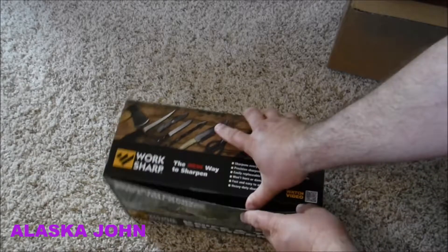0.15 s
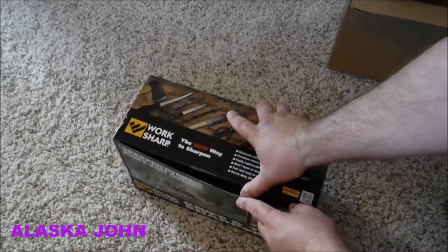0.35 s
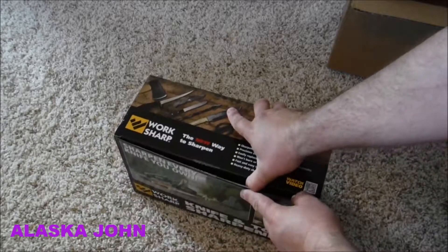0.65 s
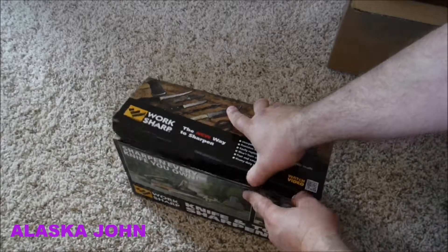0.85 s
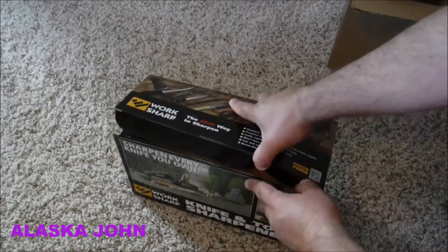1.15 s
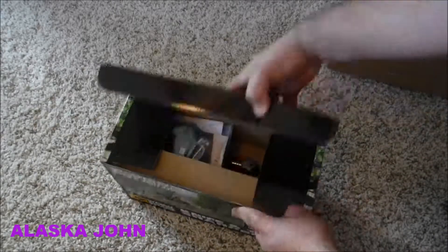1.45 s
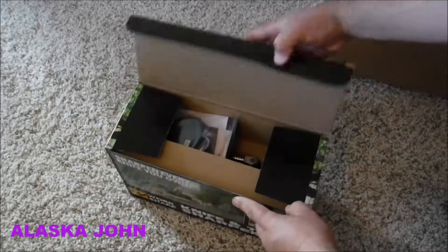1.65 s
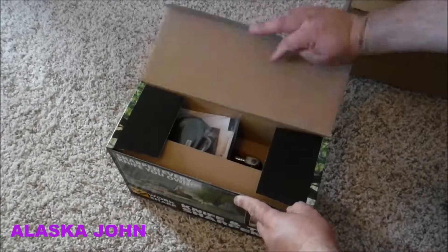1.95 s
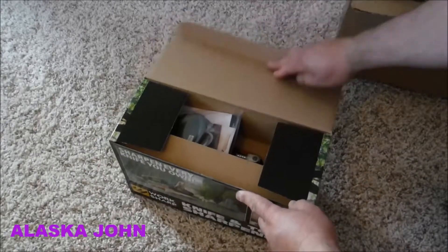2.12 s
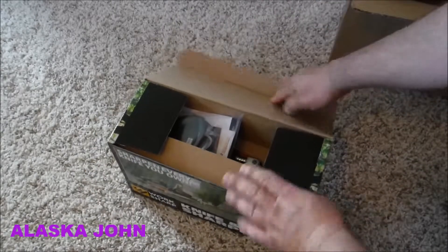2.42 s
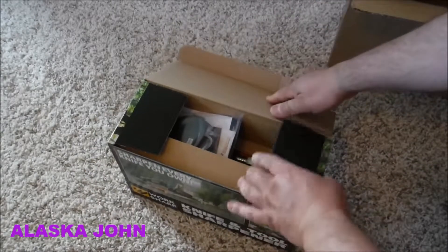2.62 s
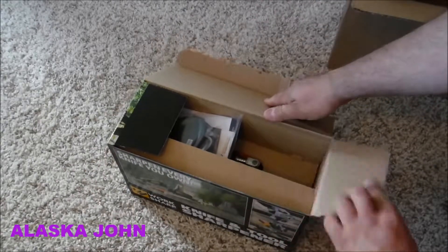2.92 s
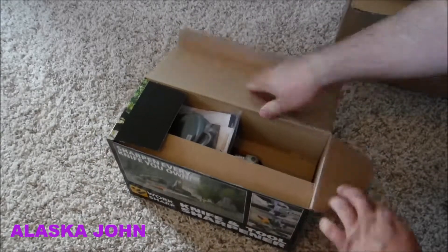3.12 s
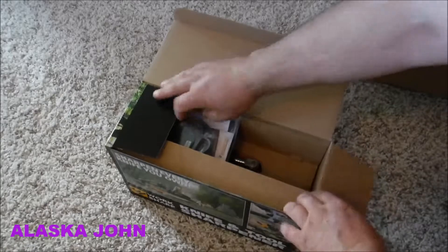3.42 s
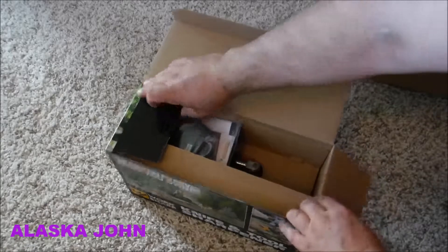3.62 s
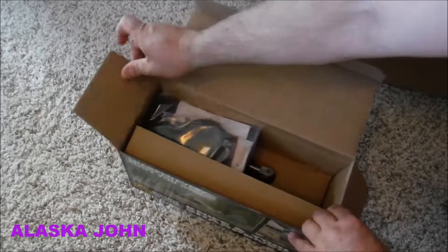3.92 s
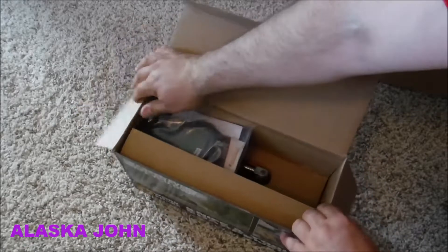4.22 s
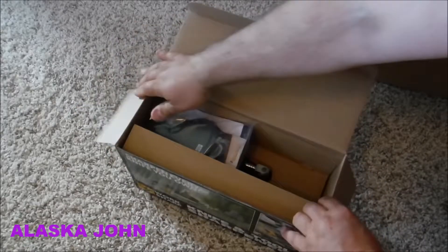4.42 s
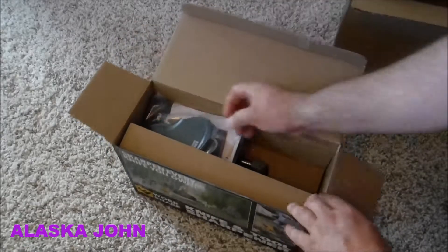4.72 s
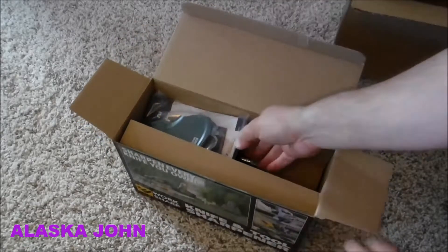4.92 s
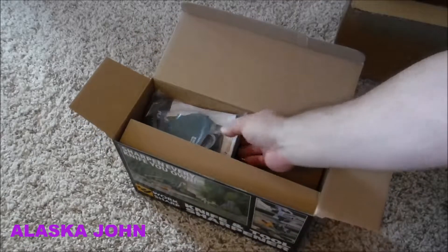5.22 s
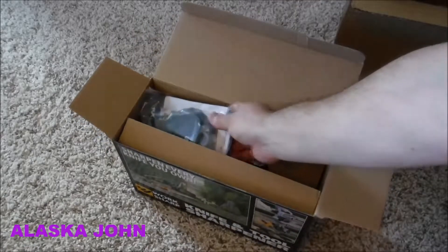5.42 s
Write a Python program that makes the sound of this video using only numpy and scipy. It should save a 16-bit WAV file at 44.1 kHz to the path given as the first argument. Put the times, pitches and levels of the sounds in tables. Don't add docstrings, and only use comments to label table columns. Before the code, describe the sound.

Close, dry indoor handling of a cardboard carton. Quiet card friction, a brief squeaky creak, then hard cracks as locking tabs release, followed by scrapes, small hollow knocks and crease ticks while flaps fold back. After one late sharp snap, fingers rustle thin plastic inside. Pauses reveal faint camera hiss; carpet keeps the room's tail short.

```python
import sys
import numpy as np
from scipy import signal
from scipy.fft import rfft, irfft, next_fast_len
from scipy.io import wavfile
from scipy.ndimage import uniform_filter1d, map_coordinates

SR = 44100
rng = np.random.default_rng(int(sys.argv[2]) if len(sys.argv) > 2 else 0)


def output_pcm(signal):
    pcm = np.clip(np.atleast_2d(signal).T, -1, 1) * 32767
    wavfile.write(sys.argv[1], SR, np.round(pcm).astype(np.int16))


def ratio(d):
    e = np.asarray(d, float) / 20
    return 10 ** e


N = 245195

# (centre [Hz], width [Hz], level [dB])
EDGE_MODES = [(4580, 1690, -1.5), (5920, 920, 4), (6895, 567, 0.5), (7840, 1420, -7.5)]
PANEL_MODES = [(1136, 790, -1.5), (1680, 810, 3.5), (2195, 585, 5), (3460, 2270, -5.5)]
BODY_MODES = [(203, 111, -8), (318, 62, 1), (485, 156, 3), (628, 223, 3.5), (926, 233, -2)]
SHEEN_MODES = [(9800, 2000, 0), (12000, 3000, -4), (14500, 3000, -9)]
PARTS = (EDGE_MODES, PANEL_MODES, BODY_MODES, SHEEN_MODES)


def unit(x):
    return x / np.sqrt(np.mean(x ** 2) + 1e-20)


def along(points, hz):
    f, v = np.transpose(points)
    return np.interp(np.log(hz + 1), np.log(f + 1), v)


def filtered(x, response):
    m = next_fast_len(N + SR // 2)
    return irfft(rfft(x, m) * response(np.fft.rfftfreq(m, 1 / SR)), m)[..., :N]


def resonance(f, hz, width_hz):
    return 1j * f * width_hz / (hz * hz - f * f + 1j * f * width_hz)


def ringing(x, modes):
    def response(f):
        h = 0
        for k, (hz, width_hz, db) in enumerate(modes):
            h = h + (-1) ** k * ratio(db) * resonance(f, hz, width_hz)
        return h / np.sqrt(np.mean(np.abs(h) ** 2))
    return filtered(x, response)


def wobble(rate_hz):
    knots = rng.standard_normal(int(N * rate_hz / SR) + 4)
    return map_coordinates(knots, [np.arange(N) * rate_hz / SR])


def patchy(x, depth_db):
    z = signal.stft(x, nperseg=256)[2]
    field = uniform_filter1d(rng.standard_normal(z.shape), size=3, axis=0)
    field = uniform_filter1d(field, size=6, axis=1)
    return signal.istft(z * ratio(depth_db * unit(field)), nperseg=256)[1][:N]


def parts_db(db, panel_db, kind):
    body_db, sheen_db = kind
    return db + np.array([[0], [panel_db], [body_db + 0.91 * panel_db], [sheen_db]])


def bursts(groups, rise, kick, delay_s):
    t = np.arange(SR // 8) / SR
    force = np.zeros((4, N + SR))
    for rows, kind in groups:
        for s, db, panel_db, t60_s in rows:
            shake = rng.standard_normal((4, len(t)))
            shake[:, :1] = kick
            life_s = np.clip(t60_s, .003, .2) * np.array([[1], [1.3], [2.2], [.7]])
            onset = np.minimum(1, (t + 1 / SR) / (rise * life_s)) ** 2
            shape = ratio(-60 * t / life_s) * onset
            level = ratio(parts_db(db, panel_db, kind) + np.array([[-4], [-1.5], [2], [-5.5]]))
            start = round((s + delay_s) * SR)
            force[:, start:start + len(t)] += shake * shape * level
    return sum(ringing(f[:N], modes) for f, modes in zip(force, PARTS))


def hiss():
    # (frequency [Hz], density [dB per Hz])
    hiss_density = [(15, -60), (25, -36), (65, -29), (100, -17), (130, -21), (400, -14), (900, -11),
                    (1150, -4), (1350, 0), (1600, -5), (2000, -12), (3200, -15), (6000, -14), (8500, -20),
                    (15700, -26)]
    hiss_db, whine_db, whine_hz = -53.5, -84, 13700
    noise = unit(filtered(rng.standard_normal(N), lambda hz: ratio(along(hiss_density, hz))))
    phase = 2 * np.pi * whine_hz * np.arange(N) / SR + 3 * wobble(40)
    whine = ratio(whine_db + 2 * wobble(4)) * np.sin(phase)
    return ratio(hiss_db) * noise + whine


def room(x):
    # (frequency [Hz], t60 [s])
    room_t60 = [(150, 0.28), (500, 0.3), (2500, 0.25), (8000, 0.14), (15000, 0.072)]
    hz, t, z = signal.stft(rng.standard_normal((8, SR // 2)), SR, nperseg=256)
    decay = ratio(-60 * t / along(room_t60, hz)[:, None])
    tails = signal.istft(z * decay, SR, nperseg=256)[1]
    tails = tails / np.linalg.norm(tails[0])
    place = (np.arange(N) // 4000) % 8 == np.arange(8)[:, None]
    delayed = np.pad(x * place, ((0, 0), (260, 0)))
    return signal.fftconvolve(delayed, tails, axes=1).sum(axis=0)[:N]


def thumps():
    # (time [s], peak [dB], pitch [Hz])
    jerks = [
        (0.907, -46, 159),
        (1.341, -23.5, 194),
        (1.805, -51, 127),
        (2.063, -29, 202),
        (3.429, -67, 140),
        (4.213, -62, 196),
        (4.721, -71, 199),
    ]
    out, t = np.zeros(N + SR), np.arange(SR // 4) / SR
    for s, db, hz in jerks:
        u = 2 * np.pi * hz * t
        start = round(s * SR)
        out[start:start + len(t)] += ratio(db + 15.0) * u * (1 - u / 2) * np.exp(-u)
    return filtered(out[:N], lambda hz: 1j * hz / (90 + 1j * hz))


def chatter():
    # (time [s], length [s], pitch [Hz], level [dB])
    creaks = [(.402, 0.045, 623, -48.5), (1.331, 0.056, 335, -23), (0.72, 0.13, 620, -48),
              (0.717, 0.2, 173, -59), (.73, 0.17, 5920, -44.5), (0.752, 0.069, 4840, -40),
              (2.043, 0.015, 2230, -25), (2.634, 0.064, 225, -56.5), (.905, 0.0078, 2510, -12),
              (0.906, .02, 1830, -33), (.907, 0.035, 316, -32.5), (4.195, 0.17, 185, -62.5),
              (0.8, 0.079, 4780, -31), (.81, .05, 6360, -36), (0.832, .03, 3230, -28.5),
              (1.336, 0.065, 256, -33), (2.117, 0.016, 1400, -35.5), (2.529, 0.013, 2180, -30.5),
              (2.552, .018, 2170, -24.5), (2.56, 0.12, 2240, -47), (3.466, 0.11, 177, -49),
              (3.474, 0.085, 445, -39), (3.48, 0.017, 1464, -35.5), (3.161, 0.035, 484, -52.5),
              (4.063, 0.11, 1870, -51.5), (4.205, 0.015, 1560, -28.5), (4.436, 0.074, 562, -55),
              (4.624, 0.054, 670, -57.5), (4.96, 0.032, 355, -49), (5.2, 0.47, 50, -73)]
    out, clock, catch = np.zeros(N), np.arange(N) / SR, ratio(3 * wobble(180))
    for s, length_s, hz, db in creaks:
        u = np.clip((clock - s) / length_s, 0, 1)
        width_hz = 3.46 * np.sqrt(hz)
        tone = filtered(rng.standard_normal(N),
                        lambda f: resonance(f, hz, width_hz) * resonance(f, hz, 1.5 * width_hz))
        out += ratio(db) * np.sin(np.pi * u ** .55) * unit(tone * catch)
    return out


def rubbing():
    # (peak time [s], rise [s], fall [s], level [dB], panel share [dB])
    card_strokes = [(0, .1, 0.19, -52.5, -7), (.27, 0.22, 0.054, -54.5, -20), (.474, 0.038, 0.28, -57, 0.5),
                    (.73, 0.05, 0.28, -45.5, 2), (.855, 0.088, 0.031, -31, -3),
                    (.89, 0.055, 0.021, -40, -6), (.93, 0.018, 0.48, -47, -1),
                    (1.434, 0.21, 0.21, -41.5, 2.5), (1.66, 0.17, .2, -49, -5),
                    (1.78, 0.041, 0.045, -46, -4.5), (2.04, .12, 0.29, -42.5, 0), (2.2, .2, 0.29, -48, 0),
                    (2.46, 0.35, 0.38, -47.5, -2), (2.962, 0.18, 0.3, -46, -31),
                    (3.14, 0.1, 0.11, -37.5, -10.5), (3.25, 0.12, 0.04, -43, -30),
                    (3.4, 0.2, 0.088, -47, -8), (3.58, 0.29, 0.052, -48, -10), (3.9, 0.55, 0.14, -47.5, -6),
                    (4.09, 0.081, 0.17, -43.5, -6), (4.19, 0.052, 0.08, -50.5, 3.5),
                    (4.23, 0.06, 0.11, -37, -8), (4.38, 0.21, 0.15, -60, -4)]
    bag_strokes = [
        (4.45, 0.04, 0.08, -42, -4),
        (4.8, 0.22, 0.045, -43.5, -11.5),
        (5.128, 0.16, 0.049, -48.5, -7.5),
        (5.46, 0.23, 0.47, -48.5, -1),
    ]
    card_rub, bag_rub = (-6.5, -13.5), (-13, -12)
    fade_db, curve = 24.5, 1.68
    grip = ratio(1.2 * wobble(30) + 1.5 * wobble(160))
    slips = (rng.random(N) < .05) * ratio(2.5 * rng.exponential(size=N))
    power, clock, out = np.zeros((4, N)), np.arange(N) / SR, np.zeros(N)
    for strokes, kind in ((card_strokes, card_rub), (bag_strokes, bag_rub)):
        for s, rise_s, fall_s, db, panel_db in strokes:
            span_s = np.where(clock < s, max(rise_s, .005), max(fall_s, .005))
            away = np.abs(clock - s) / span_s
            power += (ratio(parts_db(db, panel_db, kind)) * ratio(-fade_db * away ** curve)) ** 2
    for gain, modes in zip(np.sqrt(power), PARTS):
        jolts = unit(slips * rng.standard_normal(N))
        force = grip * (0.3 * jolts + rng.standard_normal(N))
        out += gain * unit(ringing(patchy(force, depth_db=1.5), modes))
    return out


def snaps():
    # (time [s], peak [dB], panel share [dB], burst t60 [s])
    tabs = [
        (.9049, -5.5, -2, 0.016),
        (.9101, -6, -13, 0.0059),
        (1.3354, -9, 1, 0.0068),
        (1.3406, -9, -1, 0.0088),
        (1.3454, -10.5, 6, 0.012),
        (1.3514, -44, -1, 0.041),
        (2.0224, -7, -11.5, 0.013),
        (2.1188, -20.5, -11.5, 0.0076),
    ]
    ticks = [(.038, -36.5, -5.5, 0.015), (.5583, -43, -6, 0.026), (.5824, -38, -7, 0.012),
             (.626, -32, -2.5, 0.016), (.8582, -25, -14, .023), (1.409, -28, -15, .013),
             (1.451, -27, -15, .015), (1.4706, -22, -12, 0.067), (1.9128, -43, 1, 0.022),
             (2.392, -29.5, -12, 0.017), (2.7067, -41.5, -30, 0.02), (2.9151, -29.5, -7.5, 0.031),
             (3.027, -33, -11.5, 0.012), (3.3616, -33, -24, 0.014), (3.7545, -28.5, -14, 0.01),
             (3.8722, -36, 0, 0.023), (4.2195, -7.5, -17.5, 0.01), (2.5525, -28.5, -5.5, 0.019),
             (4.7215, -21, -13, 0.0089), (2.377, -33.5, -9, .012)]
    knocks = [
        (.403, -45.5, -2.5, 0.022),
        (1.536, -35.5, -4, 0.0077),
        (2.154, -31, -6, 0.0082),
        (3.426, -26.5, -6, 0.023),
        (4.1818, -40.5, 3, 0.03),
        (4.9431, -34, -10.5, 0.019),
    ]
    crackles = [(4.8364, -32, -7, 0.049), (4.853, -38, 0.5, 0.007), (4.8714, -36, -13, .044),
                (4.9022, -30.5, -4.5, 0.014), (5.1754, -36.5, -29, 0.044), (5.2008, -35.5, -9, 0.04),
                (5.235, -26.5, -7.5, 0.014), (5.2493, -35.5, 2.5, 0.014), (5.208, -35, -14, .01),
                (5.29, -31, -20, .008), (5.296, -43, -20, .008), (5.3033, -17.5, -13.5, 0.011),
                (5.494, -29, -11, .012), (5.3667, -24.5, -5, 0.016), (5.414, -36, -2, 0.014),
                (5.4268, -32.5, 1, 0.021), (5.4396, -25.5, -12, .005), (5.458, -27.5, 0.5, 0.012),
                (5.473, -18, -8, 0.011), (5.5365, -27, -5, 0.011)]
    light_slips = [(.5869, -34.5, -9.5, 0.047), (.6312, -29, -15, 0.029), (.7185, -26, -8, 0.037),
                   (.7357, -24.5, -8, .028), (1.3348, -8, -2, 0.039), (1.4994, -25, -19, 0.014),
                   (1.7994, -27.5, -1.5, 0.037), (2.0463, -17, -5, 0.045), (2.051, -10.5, -25, 0.012),
                   (2.0655, -15, -12, 0.012), (2.1035, -29.5, -6, 0.084), (2.5332, -22.5, -3.5, 0.039),
                   (2.5531, -21.5, -17, 0.018), (3.472, -30, -15, 0.032), (3.4804, -19, -8, 0.025),
                   (3.717, -33.5, -10, 0.064), (4.2094, -14, -10.5, 0.041), (4.219, -14.5, -14.5, 0.037),
                   (4.706, -28, -20, 0.043), (4.7199, -28, -8.5, 0.063), (4.7426, -33, -14, 0.023),
                   (4.788, -33, -6, 0.033)]
    heavy_slips = [(.4107, -39.5, -8, 0.038), (.8034, -38, -8, 0.042), (.842, -49, -8, .035),
                   (1.7659, -33, -19, 0.069), (1.99, -31, 0.5, 0.044), (2.0155, -31, -16, 0.0063),
                   (2.6434, -34, -5, 0.021), (2.9494, -45.5, 6.5, 0.038), (3.1703, -41, -29, .015),
                   (3.394, -35, -3, 0.039), (4.14, -31.5, -2, 0.035), (4.4407, -33, -6, 0.031),
                   (4.964, -60, -20, 0.036)]
    sharp = bursts([(tabs, (-11.5, -57)), (ticks, (-11.5, -10)), (knocks, (-2, -27)),
                    (crackles, (-25, -18))], rise=.001, kick=5, delay_s=.0012)
    swelling = bursts([(light_slips, (-18.5, -14.5)), (heavy_slips, (-8.5, -14))],
                      rise=.15, kick=0, delay_s=-.0025)
    return sharp + ratio(6) * swelling


def scene():
    clicks = snaps()
    return (clicks + ratio(-12.0) * room(clicks) + rubbing() + chatter() + thumps() + hiss())[None]


def starved(x):
    # (time [s], thinned above [Hz])
    thin_frames = [(.075, 7000), (.135, 7000), (.265, 7500), (.48, 6500), (.78, 7500), (1.012, 7500),
                   (1.16, 2500), (1.57, 3000), (2.42, 6000), (3.295, 2000), (3.36, 2500), (3.555, 4000),
                   (3.64, 3500), (4.025, 3000), (4.09, 4000), (4.405, 2500), (4.64, 2000), (4.685, 1700),
                   (5.0, 3000), (5.365, 9000)]
    out, size = x.copy(), 1200
    hz = np.fft.rfftfreq(size, 1 / SR)
    for s, from_hz in thin_frames:
        a = round(s * SR) - size // 2
        z = rfft(x[:, a:a + size] * signal.windows.tukey(size, .8))
        band = uniform_filter1d(np.abs(z) ** 2, size=7, axis=1)
        around = uniform_filter1d(band, size=40, axis=1)
        weak = band < (.6 + hz / 9000) * around
        out[:, a:a + size] -= .9 * irfft(z * (weak & (hz > from_hz)), size)
    return out


def band_limit(x):
    return signal.sosfilt(signal.butter(12, 16970, fs=SR, output="sos"), x)


def record(dry):
    top_hz, stop_hz = 15750, 16800
    x = filtered(dry, lambda hz: np.where(hz < top_hz, 1, ratio(-16) * (hz < stop_hz)))
    x = starved(x)
    x = x / (1 + np.abs(x / .98) ** 6) ** (1 / 6)
    return band_limit(x)


dry = scene()
out = record(dry)
output_pcm(out)
```